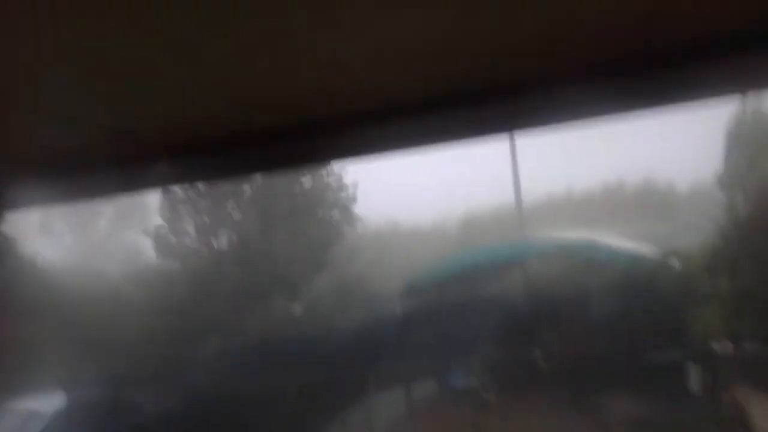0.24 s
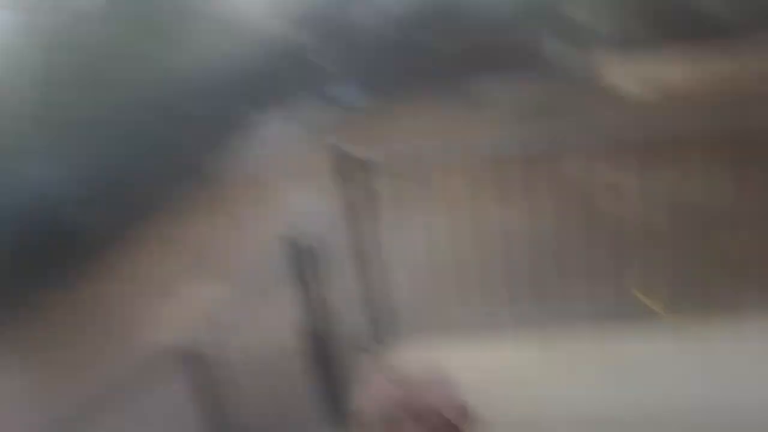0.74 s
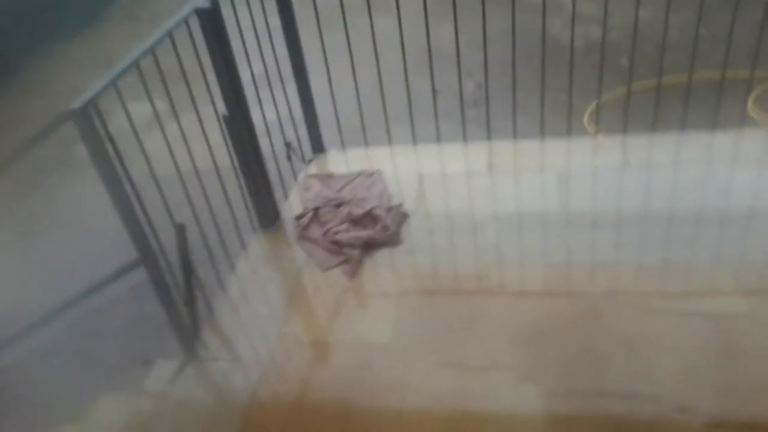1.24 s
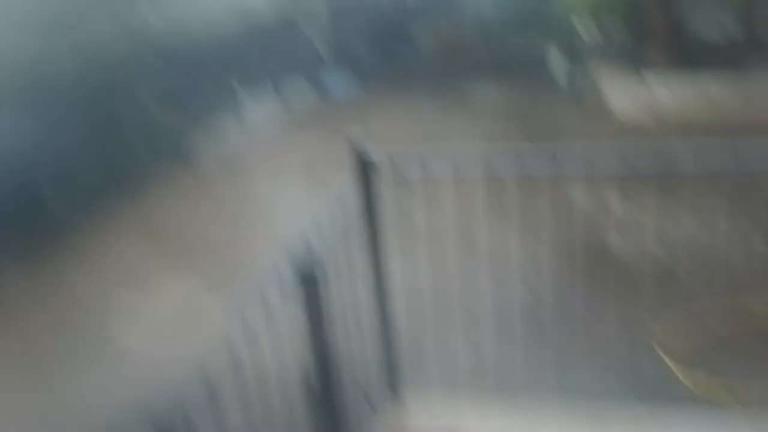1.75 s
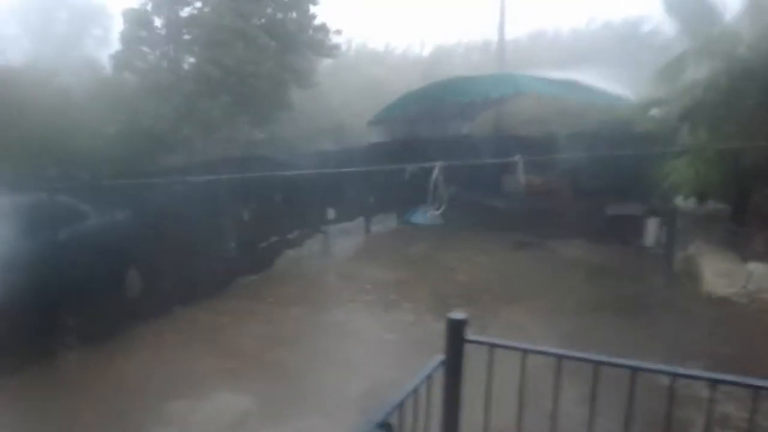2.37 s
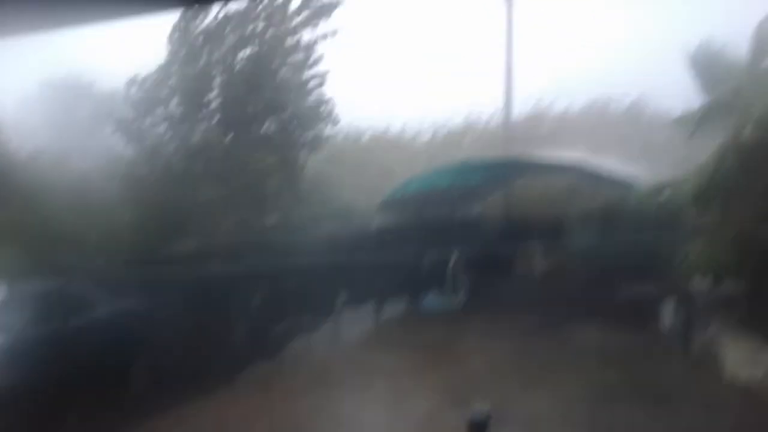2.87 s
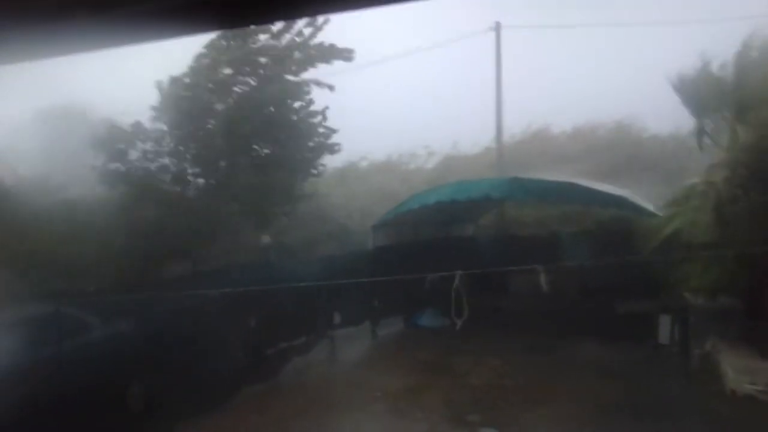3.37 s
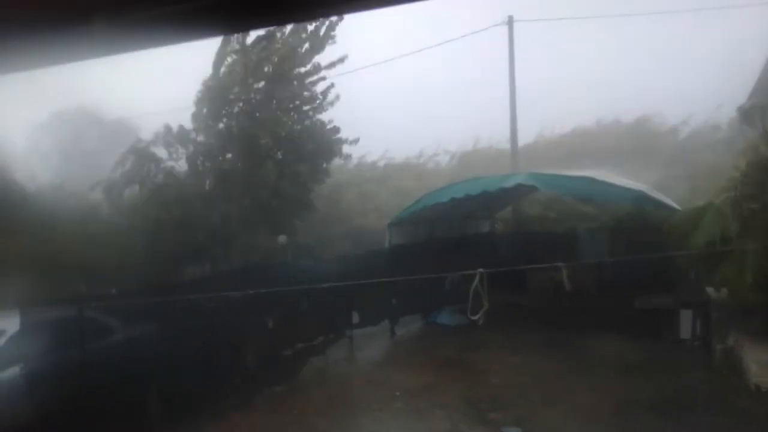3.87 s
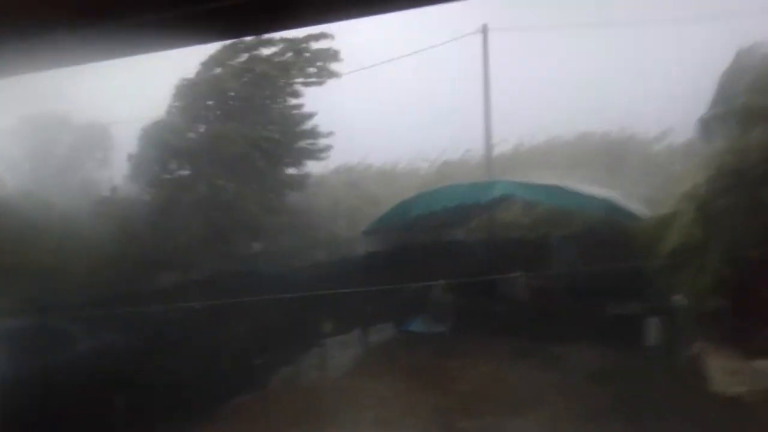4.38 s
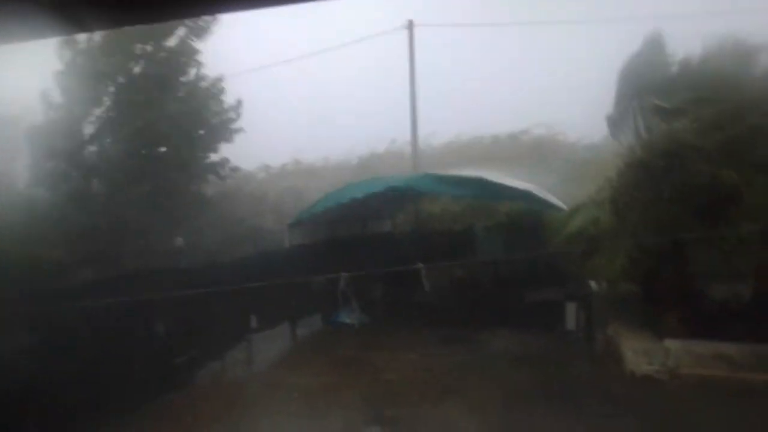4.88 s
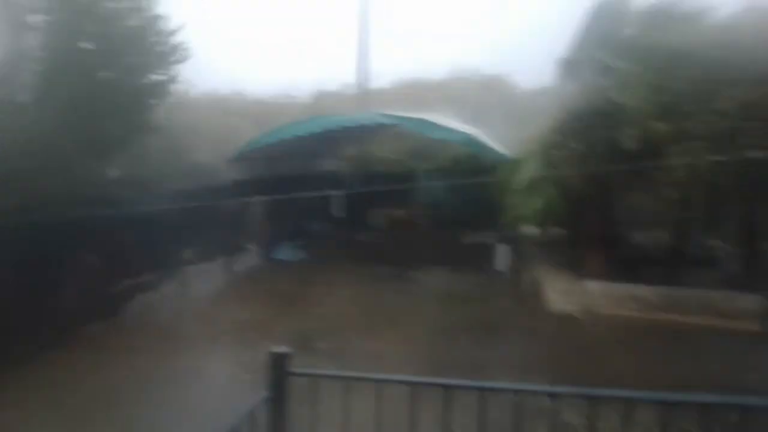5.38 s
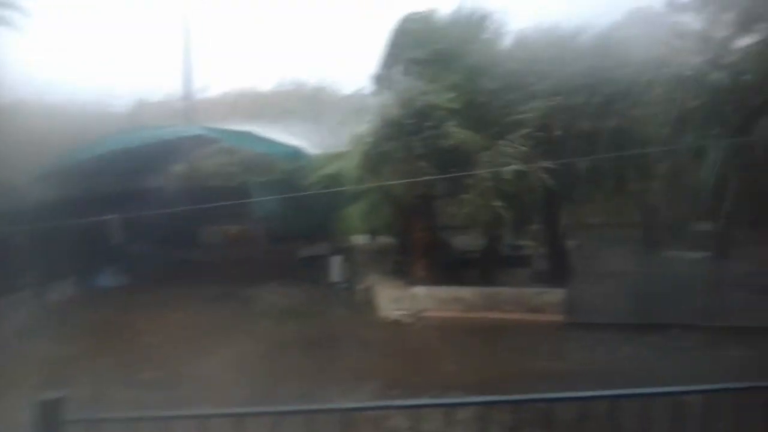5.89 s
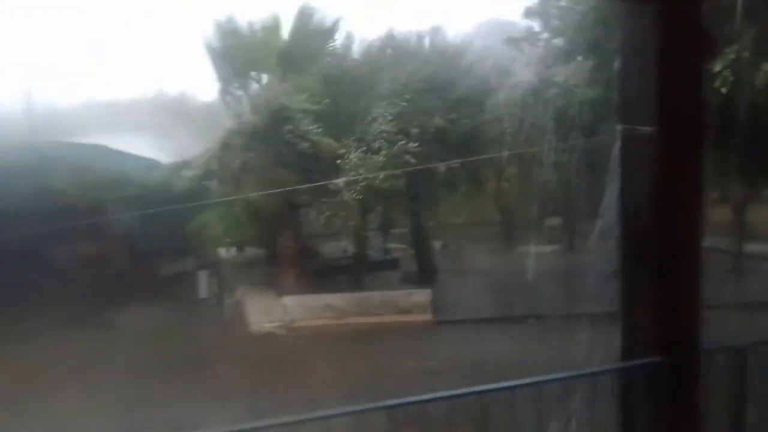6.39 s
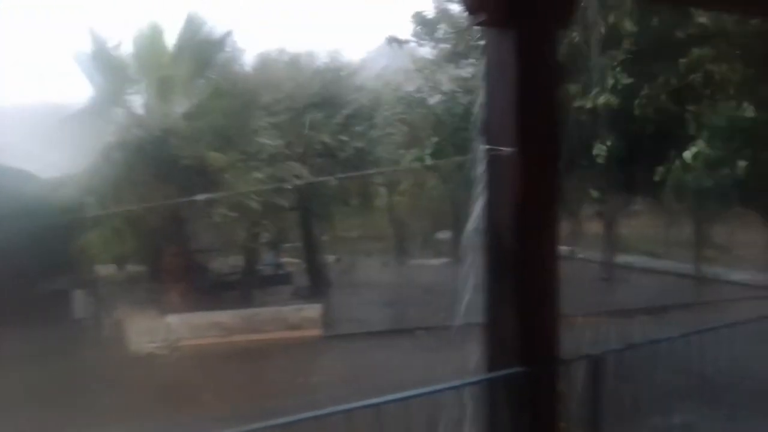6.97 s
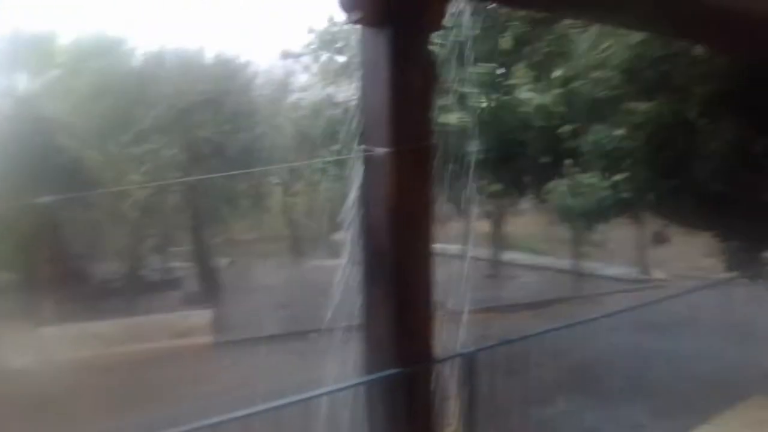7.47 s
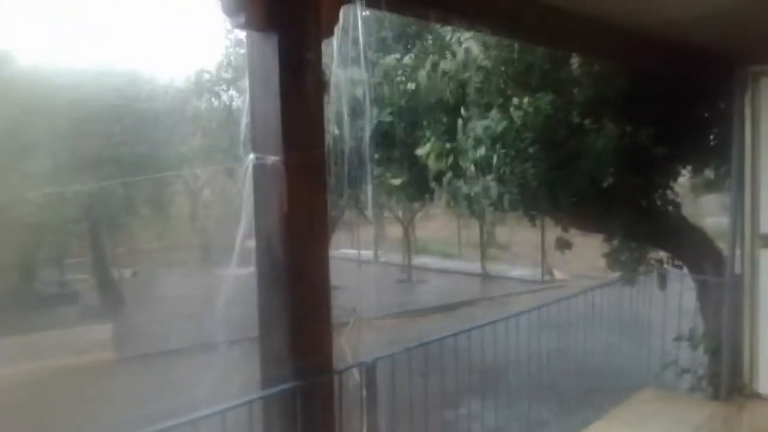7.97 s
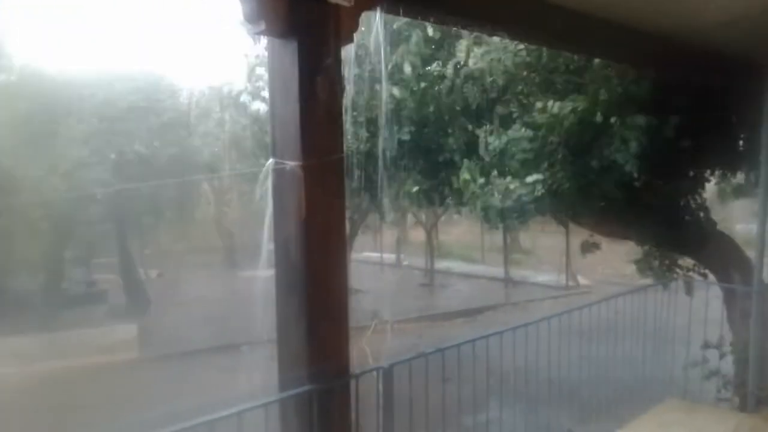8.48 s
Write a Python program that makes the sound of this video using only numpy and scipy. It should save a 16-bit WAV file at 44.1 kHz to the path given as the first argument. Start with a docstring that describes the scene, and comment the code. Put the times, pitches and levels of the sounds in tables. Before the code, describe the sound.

Heavy rain pours without pause onto a wet yard, heard from under a porch roof. A dense midrange roar sits over low drumming and under splashy hiss, with tiny plops blended in. It starts strong, eases around the middle, then surges again as gusts drive it. Soft wind thuds and two faint low bumps touch the handheld microphone; the sound is identical in both channels.

```python
"""Torrential rain on a yard: random drop impacts, shaped by spectra, merge into a roar that swells with gusts.
Low drumming sits beneath it, puddle plops ring as short resonances, and splashes hiss with a wandering treble.
Filtered noise makes the faint air and the wind that rumbles and thuds at the microphone; spray sizzles briefly.
Brief ticks of noise dot the hiss, and two soft bumps boom in the casing's modes. Both channels are alike."""
import sys
import numpy as np
from scipy import signal
from scipy.fft import rfft, irfft, next_fast_len
from scipy.io import wavfile

SR = 44100
rng = np.random.default_rng(int(sys.argv[2]) if len(sys.argv) > 2 else 0)


def int16_out(signal):
    """Quantize to a 16-bit WAV file."""
    q = np.round(np.clip(np.atleast_2d(signal).T, -1, 1) * 32767)
    wavfile.write(sys.argv[1], SR, q.astype(np.int16))


N = 385434

# Spectra of the layers, whose overall power is set elsewhere: (frequency [Hz], relative density [dB])
ROAR_SPECTRUM = [(250, -36), (550, -14), (850, -6.5), (1150, -3), (1400, -2.5), (1650, -3), (2020, -3.5),
                 (2300, -10.5), (2700, -17.5), (3400, -26.5), (6000, -57)]
DRUMMING_SPECTRUM = [(150, -50), (185, -30), (225, -11.5), (265, -6.5), (330, -2), (480, 0), (680, 1.5),
                     (900, -2), (1300, -10), (2500, -33)]
SPLASH_SPECTRUM = [(1200, -8), (2600, -6), (3200, -2.2), (4150, 0), (5000, -1.8), (6400, -4), (7800, -5),
                   (9000, -8), (10200, -2.5), (12500, -14.5)]
AIR_SPECTRUM = [(5000, -11), (9000, 8), (12200, 2), (14200, 1), (15600, -8)]
SPRAY_SPECTRUM = [(7000, -8), (9500, 3), (12200, 2), (13300, -7), (15600, -20)]
RUMBLE_SPECTRUM = [(25, -14), (50, -14), (75, -4.5), (100, 2.5), (145, 5), (170, -2), (230, 14.5),
                   (320, -6), (500, -17)]
THUD_SPECTRUM = [(100, -49), (170, -22), (220, -2), (275, 1), (350, 4.5), (430, 0), (800, -24)]

# Roar of the downpour as the gusts drive it: (time [s], level [dB])
ROAR_LEVEL = [(0, -26.6), (0.18, -25), (0.35, -25.5), (0.46, -27), (0.7, -26.5), (0.84, -24.7),
              (1.1, -25.5), (1.29, -28.2), (1.45, -28), (1.76, -25.5), (1.98, -28), (2.2, -27.5),
              (2.36, -26.5), (2.65, -31), (3.15, -29.4), (4.08, -31), (4.23, -33.5), (4.68, -33),
              (4.92, -28.5), (5.22, -26), (5.38, -27.5), (5.55, -27.5), (5.92, -31), (6.25, -27),
              (6.55, -29.5), (6.76, -30.5), (7.3, -28.5), (7.75, -27.5), (8.45, -26.5), (8.72, -29.5)]
# Low drumming of heavy drops: (time [s], level [dB])
DRUMMING_LEVEL = [(0, -31.5), (0.7, -33.5), (1.55, -33.5), (1.8, -32.5), (2.1, -34.3), (2.4, -33.5),
                  (2.8, -34.5), (3.4, -34), (4.1, -35.5), (4.65, -37), (4.95, -33.5), (5.6, -32.5),
                  (5.9, -34.8), (6.35, -33), (6.85, -35), (7.4, -33), (8.4, -32.5), (8.72, -34)]
# Splash hiss before its patchy flicker and treble edge: (time [s], level [dB])
SPLASH_LEVEL = [(0, -35.5), (1.0, -36), (1.35, -36), (1.75, -33.5), (2.12, -37), (2.45, -35), (2.66, -37),
                (3.12, -35.5), (3.6, -38.5), (3.95, -36), (4.45, -37), (5.1, -33.5), (5.45, -34),
                (5.6, -34), (5.88, -37), (6.25, -35.5), (6.85, -37.5), (7.15, -35.5), (7.55, -34.5),
                (7.8, -35.5), (8.55, -34.0), (8.72, -37.5)]
# Brightness of the hiss; only its distance from the median moves the edge: (time [s], treble level [dB])
HISS_BRIGHTNESS = [(0.0, -66), (1.24, -56), (1.36, -57), (1.7, -51), (4.66, -61.5), (4.96, -50),
                   (5.66, -49.5), (6.56, -61), (6.86, -65), (7.46, -54), (8.72, -51)]
# Borders between the pitch ranges of the splashes: (frequency [Hz])
SURFACE_BORDERS = [3600, 5100, 6800]
# Brief swells of spray: (time [s], bell half-width [s], level [dB])
SPRAY_SWELLS = [(1.72, .12, -70), (4.92, 0.22, -61.5), (5.19, .08, -59), (5.6, .19, -63), (7.58, .08, -67),
                (8.01, .04, -63.5)]
# Low flutter of the breeze between eddies: (time [s], level [dB])
FLUTTER_LEVEL = [(0, -58), (1.2, -52), (2.5, -46.5), (4.6, -45.5), (6.0, -47.5), (8.7, -48)]
# Eddies at the microphone: (time [s], bell half-width [s], rumble level [dB], thud level [dB])
WIND_EDDIES = [(1.41, 0.046, -60.5, -43), (1.93, 0.09, -54, -44), (2.21, .07, -51, -40.5),
               (2.8, 0.029, -74, -49), (3.45, 0.076, -67, -42), (3.78, 0.078, -57, -40.5),
               (5.5, 0.12, -65, -42), (5.93, 0.11, -68, -51)]
# Brief ticks of noise in the hiss, before the treble edge: (time [s], peak level [dB], centre frequency [Hz])
HISS_TICKS = [(1.726, -17, 1290), (2.184, -26, 6500), (2.418, -25.5, 6500), (2.463, -27, 3900),
              (3.563, -26.5, 6800), (4.525, -19.5, 1400), (5.625, -29, 4200), (6.642, -32, 6460)]
# Soft bumps on the casing: (time [s], bell half-width [s], level [dB])
CASING_BUMPS = [(2.181, 0.021, -30.5), (2.289, 0.011, -31)]
# Resonances of the casing: (frequency [Hz], relative level [dB])
CASING_MODES = [(268, 2), (305, 0), (352, 0.5)]

HARD_HZ, HARD_FOLLOWS = 2130, 0.23  # above this pitch the roar swings further, by this share
PLOP_LOW_HZ, PLOP_HIGH_HZ = 1157, 1753
PLOP_T60_S, PLOP_DB = 0.06, -11.5  # ring time; level against the roar
AIR_DB, AIR_FOLLOWS = -66.5, 0.57  # faint air above the hiss; its share of the splashes' swing
BREEZE_DB = -65.5  # rumble between eddies
TICK_T60_S = 0.022
CUTOFF_HZ = 15700


def from_db(db):
    """Decibels to gain."""
    return 10 ** (np.asarray(db) / 20)


def rms_one(x):
    """Scale to unit power."""
    return x / np.sqrt(np.mean(x ** 2) + 1e-20)


def in_time(rows):
    """Draw each column of a curve out to every sample."""
    s, *columns = np.transpose(rows)
    return [np.interp(np.arange(N) / SR, s, column) for column in columns]


def swell(s, half_s):
    """A bell-shaped rise and fall of height 1 around time s."""
    return np.exp(-.5 * ((np.arange(N) / SR - s) / half_s) ** 2)


def drift(rate_hz):
    """Smoothed noise with spread 1 that wanders about `rate_hz` times a second."""
    step = 40  # samples between the slow values
    r = np.exp(-2 * np.pi * step * rate_hz / SR)
    noise = rng.standard_normal(N // step + 2002)
    slow = signal.lfilter([1], [1, -2 * r, r * r], noise)[2000:]  # skip the filter's start
    return np.interp(np.arange(N) / step, np.arange(len(slow)), rms_one(slow))


def coloured(x, spectrum):
    """Shape a steady sound to a spectrum, falling 20 dB an octave beyond its ends; unit power."""
    size = next_fast_len(N)
    octave = np.log2(np.maximum(np.arange(size // 2 + 1) * SR / size, 1))
    hz, db = np.transpose(spectrum)
    knots = np.log2(hz)
    beyond = np.abs(octave - np.clip(octave, knots[0], knots[-1]))
    gain = from_db(np.interp(octave, knots, db) - 20 * beyond)
    return rms_one(irfft(rfft(x, size) * gain, size)[:N])


def coloured_noise(spectrum):
    """Steady noise with a given spectrum and unit power."""
    return coloured(rng.standard_normal(N), spectrum)


def impacts(per_s, spread_db):
    """Drops land at random: most are small or far away, a few are large or near."""
    sizes = from_db(spread_db * np.minimum(rng.exponential(1, N), 5))
    signs = rng.choice([-1, 1], N)
    lands = rng.random(N) < per_s / SR
    return sizes * signs * lands


def shower(level_db, spectrum, per_s, spread_db, flutter_db):
    """A sheet of rain: dense random impacts merge into one texture whose level flutters."""
    gust = from_db(level_db - np.mean(level_db))
    # a gust brings more drops; their count is evened out so that the level alone sets the loudness
    drops = impacts(per_s * gust, spread_db) / np.sqrt(gust)
    return coloured(drops, spectrum) * from_db(level_db + flutter_db * drift(4.2))


def rain_roar(roar_db):
    """Countless drops merge into a roar; driven by a gust they hit harder, which lifts its top."""
    roar = shower(roar_db, ROAR_SPECTRUM, per_s=9000, spread_db=2.0, flutter_db=0.18)
    high_pass = signal.butter(2, HARD_HZ, "high", fs=SR, output="sos")
    top = signal.sosfiltfilt(high_pass, roar)
    top_gain = from_db(HARD_FOLLOWS * (roar_db - np.mean(roar_db)))
    return roar + top * (top_gain - 1)


def puddle_plops(roar_db, per_s, spread_db, count=24):
    """Big drops plop into the puddles, each ringing briefly at one of `count` pitches."""
    drops = impacts(per_s, spread_db)
    pitch_index = rng.integers(0, count, N)
    r = from_db(-60 / (PLOP_T60_S * SR))  # ring decay per sample
    plops = 0
    for k, hz in enumerate(np.geomspace(PLOP_LOW_HZ, PLOP_HIGH_HZ, count)):
        w = 2 * np.pi * hz / SR
        strikes = drops * (pitch_index == k) + 1e-18  # a tiny, inaudible offset
        ring = signal.lfilter([np.sin(w), 0, -np.sin(w)], [1, -2 * r * np.cos(w), r * r], strikes)
        plops = plops + ring / hz
    return rms_one(plops) * from_db(roar_db + PLOP_DB)


def low_drumming():
    """Heavy drops merge into a low drumming under the roar."""
    level_db, = in_time(DRUMMING_LEVEL)
    return shower(level_db, DRUMMING_SPECTRUM, per_s=6000, spread_db=2.0, flutter_db=0.13)


def splash_hiss(splash_db, patchy_db, rate_hz):
    """Splashes bunch up on different surfaces, so each range of pitch flickers on its own."""
    rest = shower(splash_db, SPLASH_SPECTRUM, per_s=24000, spread_db=2.5, flutter_db=0.38)
    hiss = 0
    for hz in SURFACE_BORDERS:
        low = signal.sosfiltfilt(signal.butter(2, hz, fs=SR, output="sos"), rest)
        hiss = hiss + low * from_db(patchy_db * drift(rate_hz))
        rest = rest - low
    return hiss + rest * from_db(patchy_db * drift(rate_hz))


def treble_edge(hiss, edge_hz, hz_per_db, width_hz, waver_hz, size=512):
    """The hiss ends at a steep edge that wanders up and down, so it brightens and dulls."""
    bright_db, = in_time(HISS_BRIGHTNESS)
    hz, s, frames = signal.stft(hiss, SR, nperseg=size)
    edge = edge_hz + hz_per_db * (bright_db - np.median(bright_db)) + waver_hz * drift(10)
    frame_edge = np.interp(s, np.arange(N) / SR, edge)
    gain = .5 - .5 * np.tanh((hz[:, None] - frame_edge) / width_hz)
    return signal.istft(frames * gain, SR, nperseg=size)[1][:N]


def sizzle(splash_db, flutter_db):
    """Faint airy noise rides on the splashes, and fine droplets of spray sizzle in brief swells."""
    air_db = AIR_DB + AIR_FOLLOWS * (splash_db - np.mean(splash_db))
    air = from_db(air_db) * coloured_noise(AIR_SPECTRUM)
    level = sum(from_db(db) * swell(s, half_s) for s, half_s, db in SPRAY_SWELLS)
    spray = coloured(impacts(per_s=16000, spread_db=2.5), SPRAY_SPECTRUM)
    return air + level * from_db(flutter_db * drift(30)) * spray


def wind(lumpy_db):
    """A breeze rumbles and flutters at the microphone port; each eddy swells the rumble and thuds."""
    flutter_db, = in_time(FLUTTER_LEVEL)
    rumble_level, thud_level = from_db(BREEZE_DB), from_db(flutter_db)
    for s, half_s, rumble_db, thud_db in WIND_EDDIES:
        eddy = swell(s, half_s)
        rumble_level = rumble_level + from_db(rumble_db) * eddy
        thud_level = thud_level + from_db(thud_db) * eddy
    rumble = coloured_noise(RUMBLE_SPECTRUM) * rumble_level * from_db(lumpy_db * drift(19))
    return rumble + thud_level * coloured_noise(THUD_SPECTRUM)


def hiss_ticks():
    """Each tick is an octave-wide burst of noise that dies at once."""
    out = np.zeros(N + SR)
    t = np.arange(SR // 20) / SR
    for s, peak_db, hz in HISS_TICKS:
        band = signal.butter(2, hz * np.sqrt([.5, 2]), "band", fs=SR, output="sos")
        burst = rng.standard_normal(len(t)) * from_db(-60 * t / TICK_T60_S)
        tick = signal.sosfilt(band, burst)
        start = int(s * SR)
        out[start:start + len(t)] += from_db(peak_db) * tick / np.abs(tick).max()
    return out[:N]


def casing_bumps():
    """Each soft bump sets the casing's low modes booming for a moment."""
    t, out = np.arange(N) / SR, 0
    for s, half_s, db in CASING_BUMPS:
        boom = sum(from_db(mode_db) * np.cos(2 * np.pi * hz * (t - s)) for hz, mode_db in CASING_MODES)
        out = out + from_db(db) * swell(s, half_s) * rms_one(boom)
    return out


def scene():
    """Mix the rain, the wind and the bumps; both channels are the same."""
    roar_db, = in_time(ROAR_LEVEL)
    splash_db, = in_time(SPLASH_LEVEL)
    roar = rain_roar(roar_db)
    plops = puddle_plops(roar_db, per_s=260, spread_db=2.5)
    drumming = low_drumming()
    splashes = splash_hiss(splash_db, patchy_db=0.88, rate_hz=16) + hiss_ticks()
    hiss = treble_edge(splashes, edge_hz=9370, hz_per_db=66, width_hz=550, waver_hz=110)
    rain = roar + plops + drumming + hiss + sizzle(splash_db, flutter_db=1.5)
    mono = rain + wind(lumpy_db=2.0) + casing_bumps()
    return np.array([mono, mono])


def record(dry):
    """The microphone drops the deepest bass; the top is cut steeply."""
    bass_cut = signal.butter(2, 24, "high", fs=SR, output="sos")
    top_cut = signal.ellip(10, .1, 80, CUTOFF_HZ, fs=SR, output="sos")
    return signal.sosfilt(top_cut, signal.sosfilt(bass_cut, dry))


dry = scene()
out = record(dry)
int16_out(out)
```